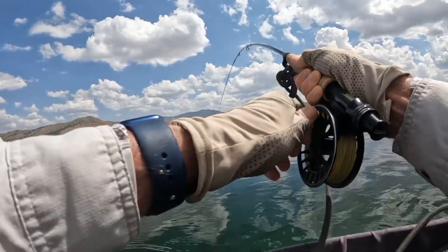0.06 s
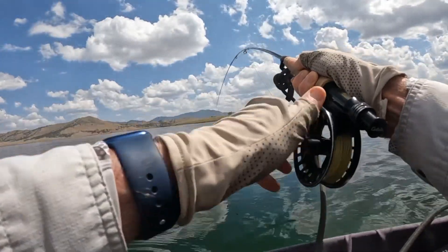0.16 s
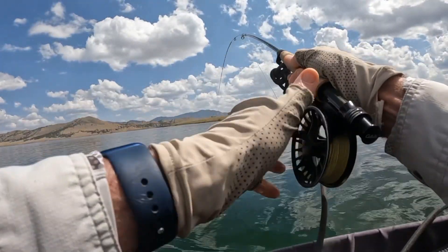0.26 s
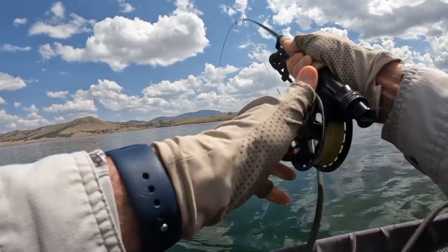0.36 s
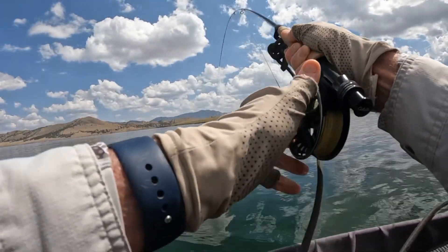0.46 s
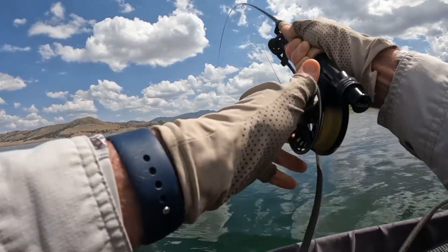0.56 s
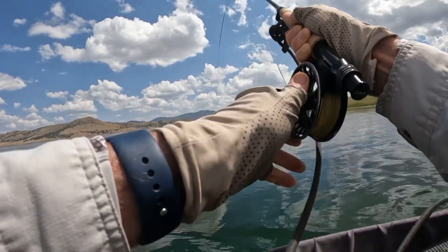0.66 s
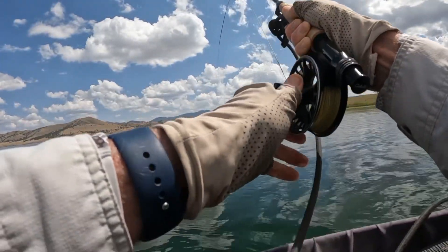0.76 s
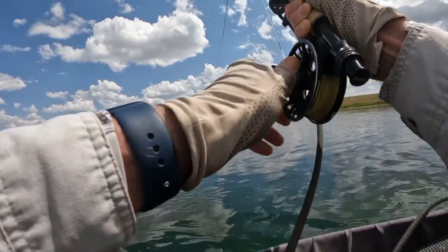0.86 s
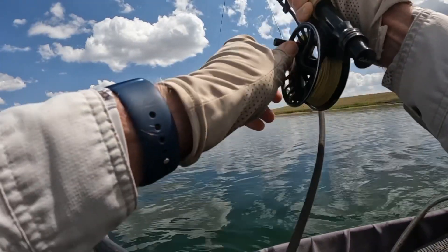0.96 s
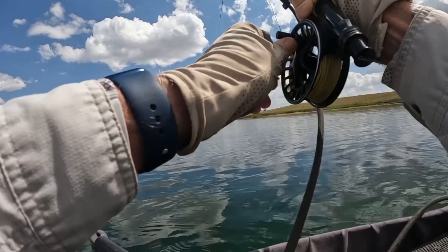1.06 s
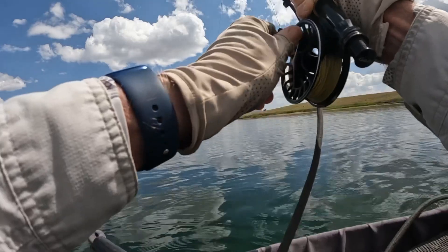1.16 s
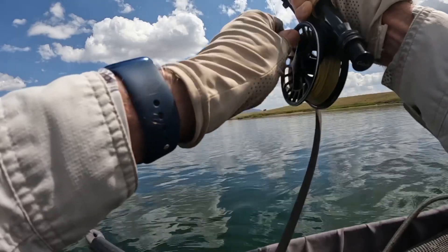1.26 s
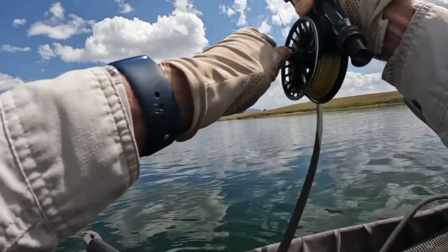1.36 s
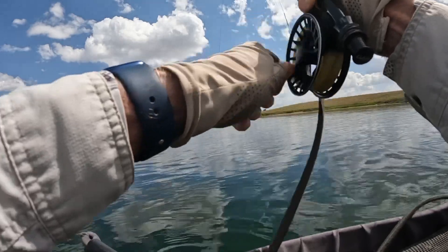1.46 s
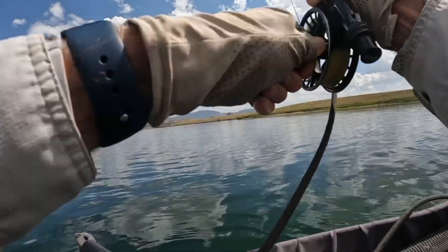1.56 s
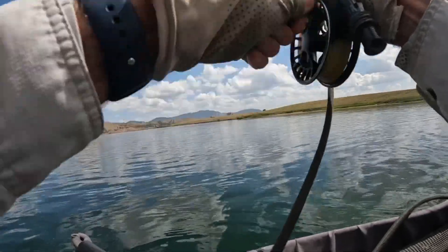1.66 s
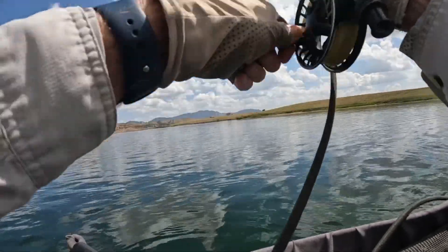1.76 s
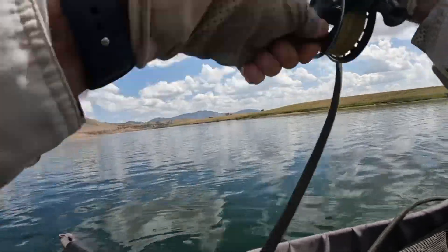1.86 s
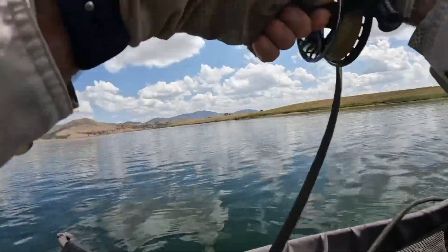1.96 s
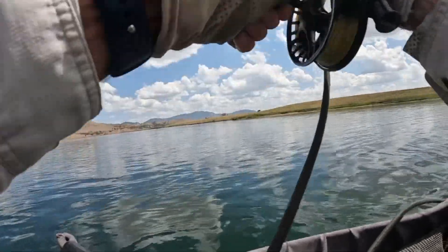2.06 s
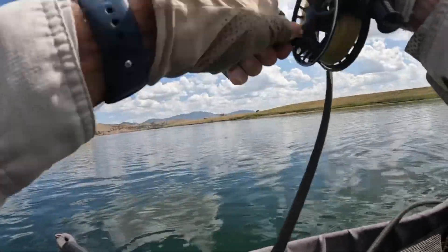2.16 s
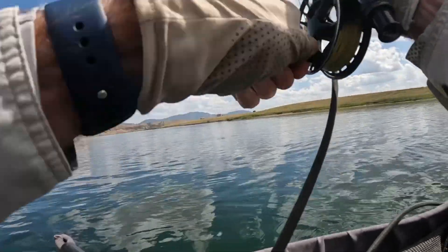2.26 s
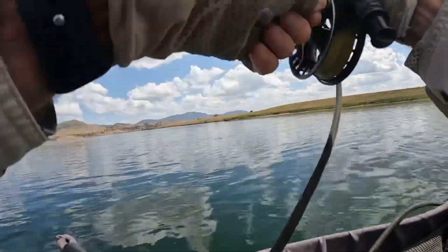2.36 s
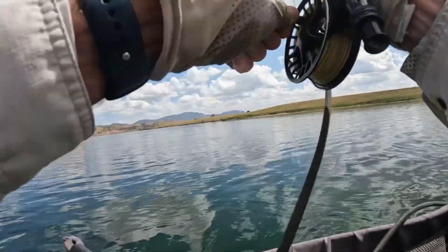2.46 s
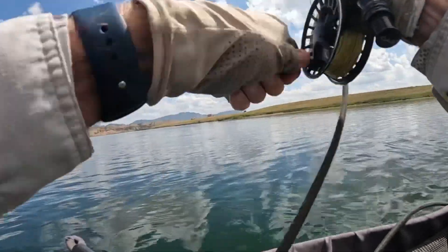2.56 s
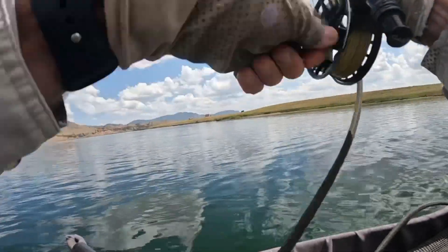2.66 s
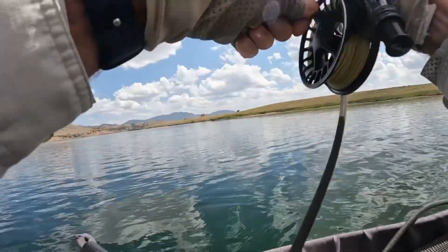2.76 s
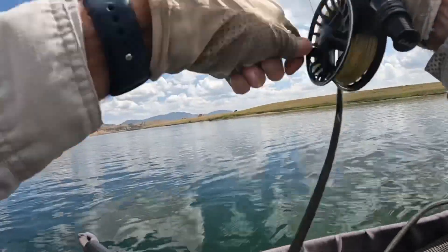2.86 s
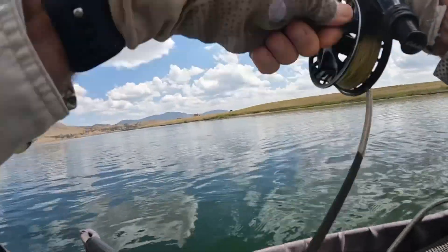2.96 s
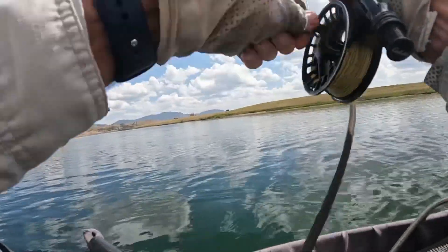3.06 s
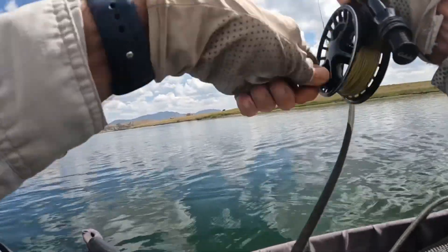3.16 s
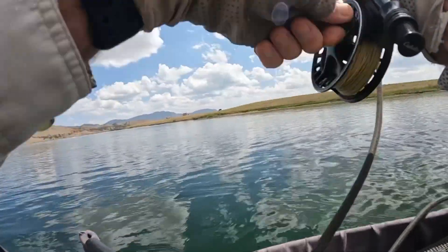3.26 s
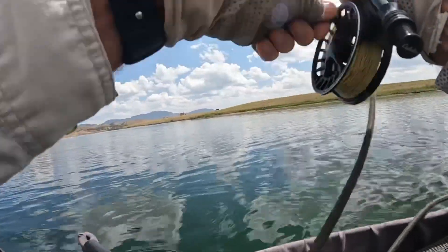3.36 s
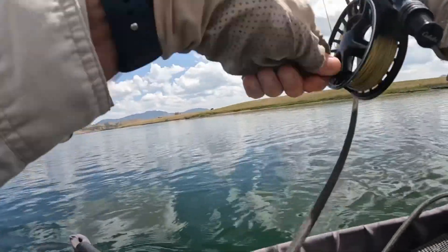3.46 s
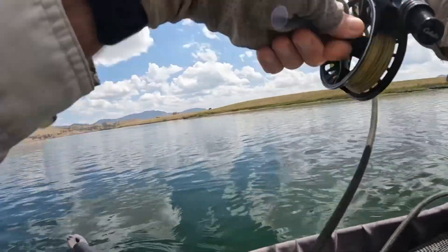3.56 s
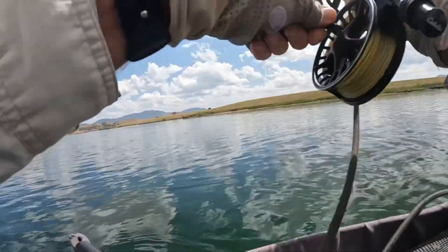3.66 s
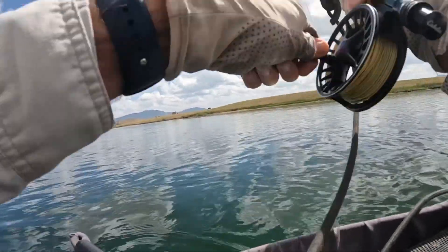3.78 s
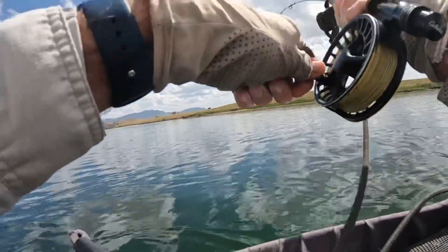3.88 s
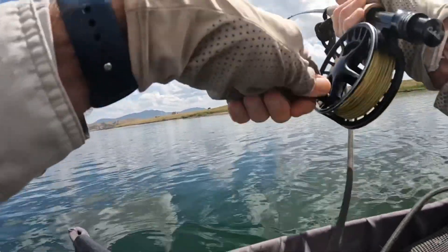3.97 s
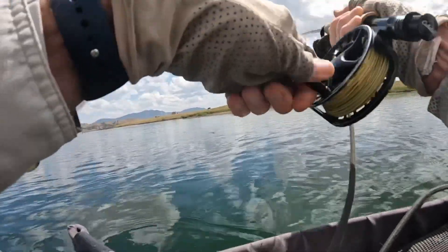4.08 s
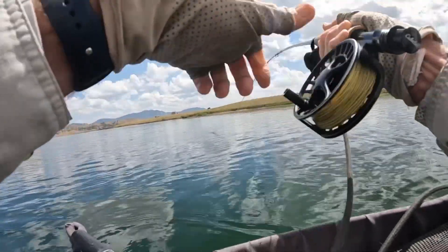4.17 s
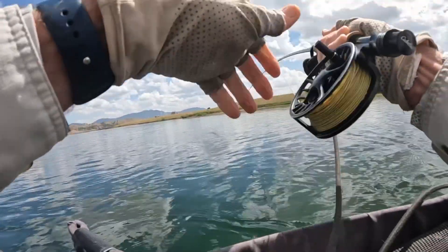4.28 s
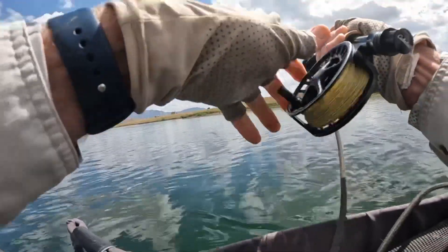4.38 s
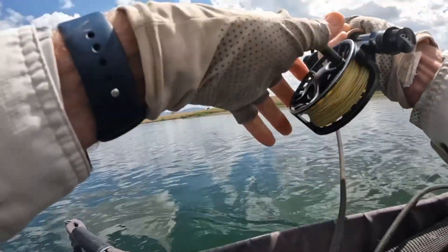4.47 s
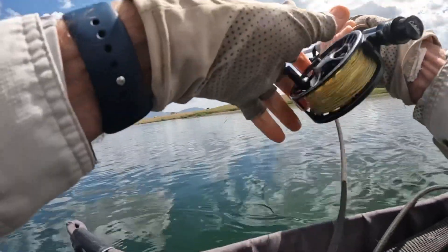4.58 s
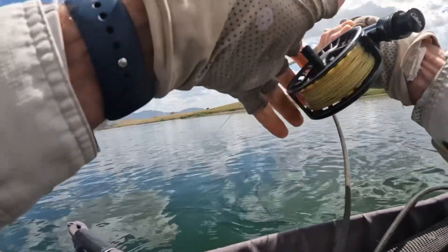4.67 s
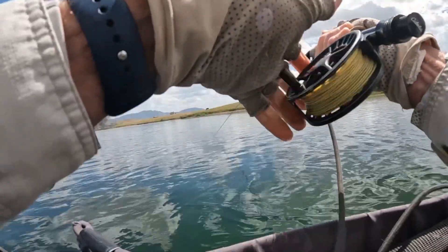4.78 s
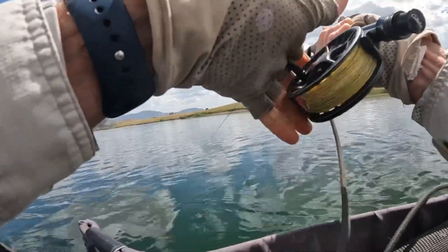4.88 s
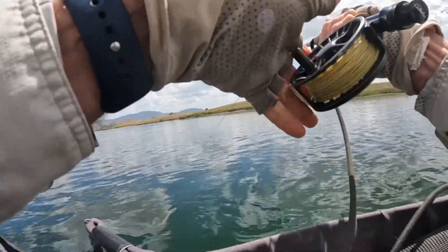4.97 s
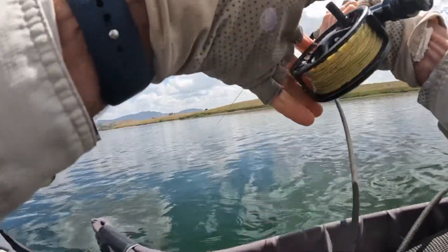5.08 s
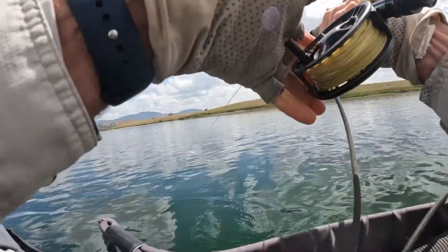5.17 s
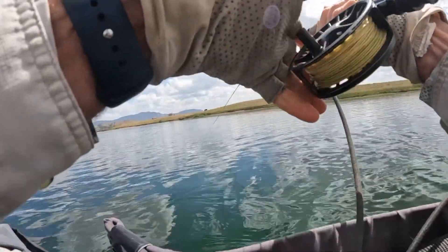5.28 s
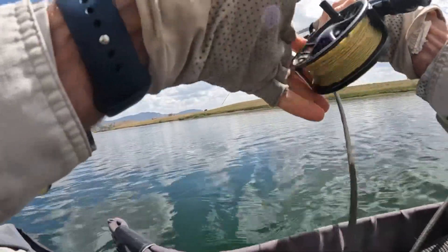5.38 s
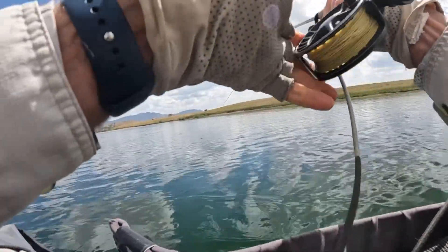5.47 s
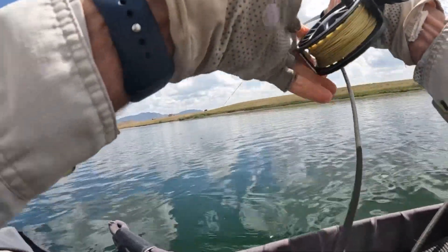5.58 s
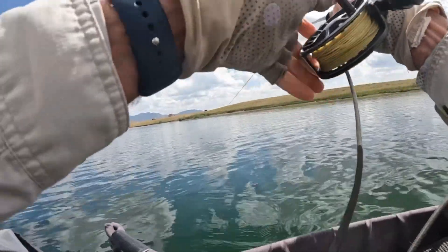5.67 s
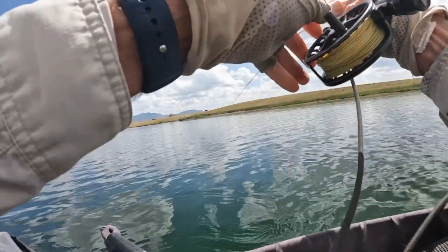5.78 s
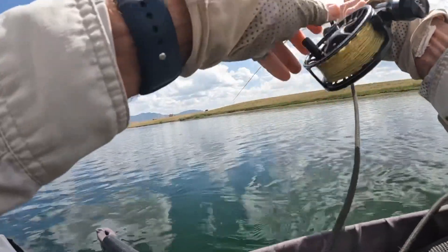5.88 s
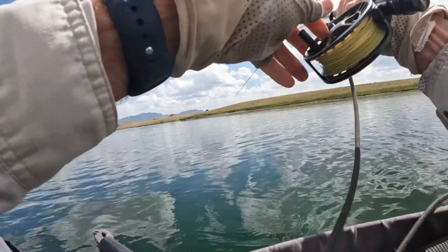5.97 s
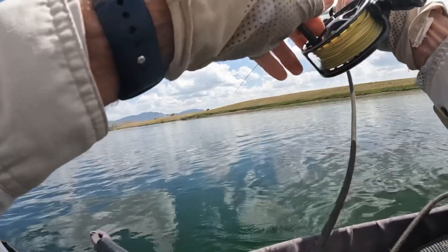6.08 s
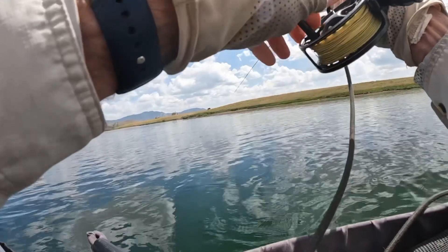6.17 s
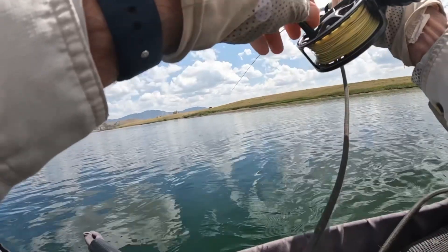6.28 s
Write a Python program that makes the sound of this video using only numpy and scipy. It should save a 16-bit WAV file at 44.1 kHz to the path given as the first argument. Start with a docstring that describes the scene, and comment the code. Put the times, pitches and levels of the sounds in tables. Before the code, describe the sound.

A fly fishing reel clicks as it is wound in and buzzes in bursts as a fish pulls line, over low wind rumble.

```python
"""Fly reel on a breezy lake

A hooked fish pulls line off a nearby reel in bursts, and a hand winds it back. A pawl (a small
catch on a spring) snaps over the teeth of the spool's gear and makes the frame ring, while the
drag (the reel's brake) rubs. The boat's hull creaks and knocks, and wind rumbles on two microphones."""
import sys
import numpy as np
from scipy import signal
from scipy.fft import rfft, irfft
from scipy.io import wavfile
from scipy.ndimage import uniform_filter1d, map_coordinates

SR = 44100
rng = np.random.default_rng(int(sys.argv[2]) if len(sys.argv) > 2 else 0)


def wav_record(signal):
    """Record a signal, one row per channel, as 16-bit PCM in the file named by sys.argv[1]."""
    frames = np.transpose(np.atleast_2d(signal))
    bounded = np.clip(frames, -1, 1)
    # unit amplitude maps onto the largest positive 16-bit level
    quanta = np.round(bounded * 32767).astype(np.int16)
    wavfile.write(sys.argv[1], SR, quanta)


N = 279064

# The fish pulls line out, one list for each burst: (time [s], speed [teeth per s])
FISH_RUNS = [
    [(0.2083, 73.9), (0.253, 144.3), (0.2698, 229.5), (0.3455, 193.3), (0.3691, 221.5), (0.3946, 253.7),
     (0.4172, 277.2), (0.4603, 188.1), (0.4814, 188.2), (0.495, 190), (0.505, 150), (0.5182, 104)],
    [(4.2494, 70.9), (4.2897, 125.4), (4.3115, 160.3), (4.4066, 195.1), (4.4346, 231.3), (4.48, 254.2),
     (4.4924, 240.6), (4.5189, 207.0), (4.5515, 278.2), (4.5676, 125.5), (4.58, 163.5), (4.6282, 86.9)],
    [(4.6371, 136.5), (4.6577, 258.7), (4.6724, 252.4), (4.6917, 188.2), (4.7063, 205.5), (4.7206, 219.2),
     (4.7358, 311.9), (4.7504, 364.0), (4.7699, 351.3), (4.7902, 351.6), (4.8035, 211.7), (4.8162, 314.9),
     (4.8368, 533.1), (4.8617, 515.9), (4.8763, 445.9)],
    [(4.894, 388.8), (4.931, 476.9), (4.9562, 394.2)],
    [(4.964, 300.7), (4.9805, 184.6), (5.0285, 313.2), (5.0446, 311.4), (5.0869, 210.2), (5.1264, 189.2),
     (5.1824, 173.8), (5.199, 170.2), (5.2559, 323.0), (5.2744, 331.0), (5.2996, 299.3), (5.3132, 298.2),
     (5.3383, 254.1), (5.3819, 250.6), (5.4335, 140.4), (5.5284, 69.0)],
    [(5.8803, 38), (5.921, 58), (5.991, 75), (6.021, 72), (6.066, 27)],
]
# The hand winds line in, one list for each stretch: (time [s], speed [teeth per s])
HAND_WINDS = [
    [(1.4185, 90.1), (1.5066, 68.6), (1.548, 74.9), (1.6338, 135.4), (1.6756, 56.1), (1.7384, 104.6),
     (1.7552, 122.3), (1.7856, 143.5), (1.7982, 176.7), (1.8641, 66.7), (1.8856, 114.6), (1.9058, 87.6),
     (1.9893, 103.9), (2.0528, 84.8), (2.2022, 129.1), (2.258, 82.8)],
    [(2.3437, 86.0), (2.4001, 160.4), (2.4243, 85), (2.447, 60), (2.4815, 79.3), (2.581, 141.5),
     (2.6153, 94.6), (2.7185, 138.6), (2.7359, 92.8), (2.8126, 85.5), (2.8297, 147.3), (2.955, 110.3),
     (2.9705, 137.3), (3.006, 145.0), (3.0262, 153.3), (3.0688, 80.9), (3.0907, 107.2), (3.1424, 122.3),
     (3.191, 165.3), (3.2394, 125.2), (3.2543, 145.2), (3.3081, 115.5), (3.36, 77.7), (3.4636, 172.7),
     (3.5245, 92.2), (3.5749, 101.9), (3.593, 126.9), (3.6681, 85.8), (3.6993, 104.5), (3.7154, 143.6),
     (3.7817, 68)],
    [(3.9851, 55.9), (4.0355, 62.4), (4.091, 46.2)],
]
# The clicks swell and change tone as the spoked spool turns: (time [s], level [dB], tone centre [Hz])
CLICK_TONE = [(0.208, -23, 3800), (0.247, -21.5, 3950), (0.271, -29, 4000), (0.301, -25.5, 3770),
              (0.334, -23, 3900), (0.358, -26.5, 4200), (0.37, -26.5, 3570), (0.397, -24.5, 3850),
              (0.46, -25.5, 3980), (0.493, -24.5, 4100), (0.52, -27.5, 3480), (1.418, -31, 4260),
              (1.475, -38, 3680), (1.496, -36, 3320), (1.573, -31, 3600), (1.621, -33.5, 4160),
              (1.723, -34, 3830), (1.777, -32, 4400), (1.858, -33.5, 3400), (1.903, -32, 3860),
              (2.067, -34, 4200), (2.097, -32.5, 4150), (2.26, -32, 3530), (2.343, -32.5, 4230),
              (2.564, -33, 3900), (2.6, -37, 3400), (2.66, -31.5, 3600), (2.693, -32, 4020),
              (2.738, -33.5, 4300), (2.909, -34.5, 4060), (2.936, -31, 3600), (3.058, -33, 4200),
              (3.094, -32, 4340), (3.202, -34.5, 3840), (3.295, -30, 4040), (3.328, -35, 4200),
              (3.376, -31, 4330), (3.459, -34.5, 4180), (3.495, -32, 3540), (3.549, -28, 3970),
              (3.627, -33, 4100), (3.705, -31, 4300), (3.785, -37, 3920), (3.984, -29.5, 4150),
              (4.093, -30.5, 3550), (4.25, -19.5, 3850), (4.327, -23.5, 4070), (4.336, -25.5, 4560),
              (4.369, -21.5, 3520), (4.399, -17, 4280), (4.42, -23, 4500), (4.432, -23, 4150),
              (4.444, -21, 4100), (4.501, -25.5, 3600), (4.54, -21, 3870), (4.555, -20, 4000),
              (4.573, -27, 3270), (4.6, -25.5, 3820), (4.63, -20, 4220), (4.636, -19.5, 4100),
              (4.648, -22, 4040), (4.681, -22.5, 3560), (4.69, -28, 3700), (4.735, -21.5, 3740),
              (4.747, -21, 3900), (4.762, -22, 3400), (4.774, -24, 4370), (4.786, -20, 4030),
              (4.807, -24, 3670), (4.822, -21, 3900), (4.873, -19, 3970), (4.894, -21.5, 4000),
              (4.918, -18.5, 3860), (4.933, -25.5, 4100), (4.955, -15, 4060), (4.972, -22.5, 3800),
              (5.002, -26, 4200), (5.02, -19, 3760), (5.053, -23.5, 3900), (5.08, -20, 4670),
              (5.11, -24, 3400), (5.149, -24.5, 4230), (5.173, -23, 3460), (5.193, -18.5, 3770),
              (5.295, -24.5, 4020), (5.328, -18.5, 3600), (5.337, -22.5, 3630), (5.355, -24, 4000),
              (5.379, -19, 4260), (5.403, -24, 3420), (5.445, -23.5, 4280), (5.484, -24, 3590),
              (5.53, -18.5, 4040), (5.62, -42, 4070), (5.88, -26, 4700), (5.913, -29, 3780),
              (5.997, -21, 4010), (6.065, -23, 3840)]
# Tone of a click, running out and then winding in: (low [dB], middle [dB], treble [dB])
TONE_BY_DIRECTION = [(-6.5, -13, -12.5), (0.5, -1, -8)]
# Single clicks of the creeping spool: (time [s], level [dB], middle over low [dB], treble boost [dB])
LONE_CLICKS = [(0.0024, -31.5, -4, -8), (0.0209, -35, -9, 2), (0.0463, -35, -1, -1),
               (0.0809, -31.5, -8, -2.5), (0.1507, -34, -4, -3), (0.1757, -34.5, -3, -2),
               (0.194, -33.5, -1, -3), (0.537, -44.5, 16, -1), (0.8715, -60, -5, 8),
               (0.9839, -33.5, -5, -2.5), (1.015, -33, -9, -2), (1.0522, -33.5, -19, -2),
               (1.0817, -33.5, 10, 1), (1.1084, -29.5, -9, -6), (1.13, -51, 0, 2), (1.2074, -65, 0, 3),
               (1.221, -31.5, 6, -1), (1.2488, -43, 6, 6), (1.2665, -36.5, 12, -9),
               (2.2714, -30.5, -4, -5.5), (2.3243, -29.5, -9, -8.5), (3.8024, -40, -8, 6),
               (3.8286, -38, -7, 0), (3.856, -37, -16, 2.5), (3.8878, -33.5, -10, -2),
               (3.9385, -31.5, -8, 5.5), (4.179, -40.5, 40, -19), (4.2165, -35.5, -6, -6),
               (5.544, -28.5, -12, -8.5), (5.5677, -28.5, -7, -8), (5.6194, -29.5, 0, -10.5),
               (5.6504, -68.5, 0, 18), (5.7624, -32.5, -14, -5), (5.8019, -35, -11, 0),
               (5.8295, -33, -8, -2.5), (5.8537, -36, -2, 0), (6.2737, -40.5, 31, 0.5)]
USUAL_CLICK_DB, USUAL_CLICK_HZ = -26, 3900

def gear_teeth():
    """Each passing tooth makes one click: (time [s], low [dB], middle [dB], treble [dB])."""
    times = np.concatenate([beats(rows)[0] for rows in FISH_RUNS + HAND_WINDS])
    tone_s, tone_db, tone_hz = np.transpose(CLICK_TONE)
    db = np.interp(times, tone_s, tone_db)
    tilt_db = 11 * np.log2(np.interp(times, tone_s, tone_hz) / USUAL_CLICK_HZ)
    low_db, middle_db, treble_db = np.array(TONE_BY_DIRECTION)[winding_in(times)].T
    treble_db = treble_db + USUAL_CLICK_DB + .39 * (db - USUAL_CLICK_DB)  # the treble swells less
    turning = np.c_[times - .0013, db + low_db - tilt_db, db + middle_db + tilt_db, treble_db]
    times, db, tilt_db, treble_db = np.transpose(LONE_CLICKS)
    creeping = np.c_[times, db - tilt_db / 2, db + tilt_db / 2, db + treble_db]
    clicks = np.vstack([turning, creeping])
    return clicks[np.argsort(clicks[:, 0])]


# When the spool turns inward: (start [s], end [s])
WINDING_TIMES = [(0, .12), (.8, 4.13)]

def winding_in(times):
    """Gives 1 while line is wound in, otherwise 0."""
    return sum((start < times) & (times < end) for start, end in WINDING_TIMES)


def pawl(clicks, chatter_s, chatter_db, gain_db):
    """The pawl snaps off each tooth: the frame rings, with a bright scratch, a crack and a ping."""
    times, *levels = np.transpose(clicks)
    levels = np.array(levels) + gain_db
    low_db, middle_db, treble_db = levels
    winding = winding_in(times)
    starts = np.round((times + .0008) * SR).astype(int)
    frame = frame_rings(starts, levels, winding, chatter_s, chatter_db)
    scratch = band(fade(taps(starts, treble_db - 6), .0021) * stereo_noise(.7), 7100, 12700)
    crack = band(taps(starts, middle_db + np.where(winding, 11, 9)), 6600, 8800)  # the bare spring
    tone_s, _, tone_hz = np.transpose(CLICK_TONE)
    tone_ratio = np.interp(times, tone_s, tone_hz) / USUAL_CLICK_HZ
    ping_hz = USUAL_CLICK_HZ * tone_ratio ** 1.43  # swings wider than the tone centre
    ping_db = (low_db + middle_db) / 2 + np.where(winding, 7.5, 17)
    return frame + scratch + (crack + pings(starts, ping_db, ping_hz)) * amp([[-.9], [.9]])


def pings(starts, db, hz):
    """Each snap opens with a blip about two waves long, at a pitch of its own."""
    span, out = np.arange(60), np.zeros(N + 60)
    cycles = np.outer(hz, span / SR) - 1.6
    blips = -np.exp(-.5 * (cycles / .56) ** 2) * np.cos(2 * np.pi * cycles)
    np.add.at(out, starts[:, None] + span, amp(db)[:, None] * blips)
    return out[:N]


# The notes that the spool and frame ring at: (pitch [Hz], level running out [dB],
# level winding in [dB], ring time before the limit below [s], left over right [dB])
FRAME_NOTES = [(2190, -17, -11, 0.0023, 29), (2660, -4, -4.5, 0.0063, -16), (2850, -15, -9, 0.036, -6),
               (3200, 2.5, -4.5, 0.022, 0), (3810, -4, -1, 0.033, -2.5), (4144, -3.5, -6, 0.048, 3.5),
               (4593, 8, 5.5, 0.0057, -0.5), (5100, -0.5, -27, 0.024, -11), (6174, 7, 5, 0.015, -5),
               (6663, 12.5, 9, 0.005, -1), (7710, -3.5, -9.5, 0.017, -7), (8530, -45, -6, 0.0081, -7),
               (9270, -3.5, -7.5, 0.012, 2.5), (10360, -6.5, -22.5, 0.048, 4),
               (11510, -5.5, -11.5, 0.014, 4.5), (12000, -6, -8.5, 0.01, 6), (13100, -14, -24, 0.0067, -3),
               (14700, -30, -32, 0.0028, 1)]
LONGEST_RING_S = .011  # every note of the frame dies within 11 ms, so the clicks stay short and dry

def frame_rings(starts, levels, winding, chatter_s, chatter_db):
    """Each snap strikes all the frame's notes, and the pawl's brief chatter roughens them."""
    out = np.zeros((2, N))
    noises = rng.standard_normal((2, N))
    for hz, out_db, in_db, ring_s, pan_db in FRAME_NOTES:
        alike = np.clip(1.2 - hz / 14000, 0, 1)
        grit = spread(*np.roll(noises, rng.integers(N), axis=1), alike)  # its own noise for each note
        ring_s = min(ring_s, LONGEST_RING_S)
        # Blend the low, middle and treble levels to suit this pitch.
        shares = [np.interp(hz, [3000, 4500, 6000], one) for one in np.eye(3)]
        db = np.dot(shares, levels) + np.where(winding, in_db, out_db)
        db += np.interp(hz, [5500, 7500], [2.5, 3.5]) * tooth_drift(len(starts))
        rattle_db = db + chatter_db + 4 * winding  # the pawl drags more when winding in
        rattle_db += np.interp(hz, [7000, 9000], [0, 6])
        chatter = fade(taps(starts, rattle_db), chatter_s) * grit
        rough = band(ring(chatter, hz, ring_s), hz / 2.33, hz * 1.4)
        wandering_hz = hz + 80 * tooth_drift(len(starts))  # shifts as spool and hand move
        clean = struck_note(starts, db + 1, wandering_hz, ring_s)
        out += (clean + rough) * amp([[pan_db / 2], [-pan_db / 2]])
    return out


def struck_note(starts, db, hz, ring_s, rise_s=.0005):
    """One note of the frame swells quickly and dies away after every tooth."""
    span = np.arange(int(ring_s * SR))
    t, out = span / SR, np.zeros(N + len(span))
    shape = amp(-60 * t / ring_s) * (1 - np.exp(-t / rise_s))
    notes = amp(db)[:, None] * shape * np.sin(2 * np.pi * np.outer(hz, t))
    np.add.at(out, starts[:, None] + span, notes)
    return out[:N]


# Moments when the gear catches: (time [s], low [dB], middle [dB], treble [dB])
GEAR_CATCHES = [(0.49, -33, -38, -33.5), (1.607, -37, -43, -30), (2.9315, -42, -27, -27),
                (3.2644, -32, -35, -36), (4.8822, -10.5, -22, -19), (4.9592, -25, -9, -32),
                (5.2792, -15, -34, -37)]

def gear_catches():
    """The pawl catches harder and rattles for longer than on an ordinary tooth."""
    return pawl(GEAR_CATCHES, chatter_s=.003, chatter_db=-11.5, gain_db=-20.5)


# Tone of the rubbing brake: (frequency [Hz], level [dB])
RUB_TONE = [(710, -23.5), (1200, -9), (1600, -6), (3350, 4.5), (3790, 6.5), (5170, -4.5), (6220, -4.5),
            (8460, -9.5), (12200, -15.5), (13800, -17), (14300, -54)]
HALT_GAP_S, STIR_S = .052, .036  # a longer gap is a halt, quiet until just before the next tooth

def drag_rub(tooth_times):
    """The brake rubs the spool with a grainy hiss, louder and brighter the faster it turns."""
    t, gaps = np.arange(N) / SR, np.diff(tooth_times)
    last = np.clip(np.searchsorted(tooth_times, t) - 1, 0, len(gaps) - 1)
    until_next = tooth_times[last + 1] - t
    halted = (gaps[last] > HALT_GAP_S) & (np.abs(until_next - STIR_S / 2) > STIR_S / 2)
    speed = -np.log2(100 * gaps[last])  # 0 at 100 teeth per second, 1 more for each doubling
    smoothing = int(.045 * SR)
    db = uniform_filter1d(-49.5 + 3.5 * speed + 1.5 * winding_in(t) - 11.5 * halted, smoothing)
    click_db, click_hz = curves(CLICK_TONE)
    db += .45 * (click_db - uniform_filter1d(click_db, SR // 4))  # swells with the clicks
    hiss = coloured(stereo_noise(.85), RUB_TONE)
    dull = signal.sosfiltfilt(signal.butter(2, 6000, fs=SR, output="sos"), hiss)
    hiss = dull + amp(3.5 * uniform_filter1d(speed, smoothing)) * (hiss - dull)
    tilt = np.clip(4.2 * np.log2(click_hz / USUAL_CLICK_HZ), -.9, .9)  # its tone follows the clicks
    hiss += tilt * (band(hiss, 2760, 3950) - band(hiss, 2300, 4300))
    return amp(db + 1.5 * drift(150) + [[-1.5], [.6]]) * hiss


# Single slips in the hull: (time [s], level [dB])
HULL_SLIPS = [(2.346, -30.5), (4.653, -28), (4.685, -29), (4.812, -29), (4.84, -27), (4.868, -26),
              (4.909, -30), (5.271, -24), (5.486, -28.5), (5.528, -29), (5.563, -30), (5.73, -38),
              (6.032, -29.5)]
# Quick runs of slips, one list for each creak: (time [s], speed [slips per s], level [dB])
HULL_CREAKS = [
    [(.59, 135, -54), (.7, 83, -44.5), (.8, 99, -47), (.86, 62, -67)],
    [(2.072, 33.7, -39), (2.11, 30, -30), (2.29, 40, -32)],
    [(4.04, 89.6, -38), (4.15, 140, -33.5), (4.2, 61.3, -27), (4.4, 74, -31), (4.55, 48.4, -26),
     (4.64, 42, -30)],
]

def hull_creaks():
    """Each slip is a tick that falls in pitch as it runs through the hull; many make a creak."""
    slips, edges = np.zeros((2, N))
    for time, db in HULL_SLIPS:
        slips[round(time * SR)] = amp(db)
    for rows in HULL_CREAKS:
        times, rate = beats(rows)
        times += .0012 * rng.standard_normal(len(times))
        creak_s, _, creak_db = np.transpose(rows)
        db = np.interp(times, creak_s, creak_db) + .2 * rng.standard_normal(len(times))
        starts = np.round(times * SR).astype(int)
        slips[starts] = amp(db)
        edges[starts] = amp(db + 1.9 * np.log2(rate / 100))  # fast slips snap more sharply
    t = np.arange(700) / SR
    hz = 330 + 1100 * np.exp(-t / .00075)
    tick = np.sin(2 * np.pi * np.cumsum(hz) / SR) * (1 - np.exp(-t / .0037)) * np.exp(-t / .0011)
    ticks = signal.fftconvolve(slips, amp(9.5) * tick)[:N]
    snap = amp(15) * band(edges, 1900, 3000)
    panel = amp(-11) * ring(edges, 1050, ring_s=.006)
    return (ticks + snap + panel) * amp([[1.2], [-1.2]])


# Dull bumps in the boat: (time [s], level [dB], pitch [Hz], rough length [waves])
BUMPS = [(0.352, -49, 1010, 11), (0.372, -36, 1160, 9.1), (3.299, -30, 1210, 12), (3.849, -20, 492, 7.5),
         (3.919, -31, 394, 2.7), (4.556, -25, 114, 2.5), (6.136, -34, 200, 3.9)]

def knocks():
    """Soft blows on the tackle and hull each ring for a few waves that swell and die."""
    out = np.zeros(N)
    for time, db, hz, cycles in BUMPS:
        ring_s = .53 * cycles / hz
        blow = taps(round(time * SR), db)
        soft = ring(ring(blow, hz, ring_s), hz, ring_s)  # ringing twice softens the start
        out += soft * amp(db) / np.abs(soft).max()
    return out


# Low rumble of the breeze, plus the low body of the hull's long creak at 4.0-4.65 s:
# (time [s], deep level [dB], body level [dB])
RUMBLE = [(0.0, -39, -52), (0.09, -40, -59.5), (0.12, -48.5, -54.5), (0.6, -36.5, -66),
          (0.65, -44.5, -59.5), (0.88, -38, -57), (0.97, -40.5, -53), (1.16, -35, -62.5),
          (1.53, -38.5, -62), (2.08, -38, -50), (2.4, -41, -53.5), (2.68, -36, -56), (2.84, -46.5, -66),
          (2.98, -35.5, -57.5), (3.19, -45.5, -59.5), (3.33, -38.5, -58.5), (4.02, -42.5, -53),
          (4.44, -45, -40.5), (4.65, -47.5, -51), (5.71, -37.5, -58), (5.87, -50.5, -51.5),
          (6.33, -39.5, -66)]
# Gusts that thump the microphones: (time [s], boost to the low rumble [dB], half length [s])
GUSTS = [(0.36, 9, 0.036), (0.928, 9, 0.041), (1.492, 13, 0.027), (1.72, 7, 0.14), (2.068, 0, 0.038),
         (2.526, 17, 0.062), (2.863, 18.5, 0.076), (3.034, 3, 0.024), (3.756, 15, 0.044), (3.93, 14, 0.092),
         (4.884, 7.5, 0.05), (5.328, 7, 0.24), (5.616, 7.5, 0.29), (5.897, 12, 0.08)]

def wind_and_hull_rumble():
    """Wind on the microphones makes a lumpy rumble; one swell is the body of the hull's long creak."""
    deep_db, body_db = curves(RUMBLE)
    t = np.arange(N) / SR
    low_db = -58.5 + sum(db * np.exp(-((t - time) / half_s) ** 2) for time, db, half_s in GUSTS)
    lumps = drift(12)
    deep = amp(deep_db + 2.5 * lumps) * unit(band(stereo_noise(.55), 7, 30))
    low = amp(low_db + 3.2 * lumps) * unit(band(stereo_noise(.8), 55, 150))
    body_gain = amp(body_db + 1.54 * lumps + 2.8 * drift(40))
    body = body_gain * unit(band(band(stereo_noise(.7), 48, 295), 180, 2900))
    return deep + low + body


# Tone of the open air: (frequency [Hz], level [dB])
AIR_TONE = [(240, -29), (400, -18), (842, -12), (1120, 6), (1420, 2), (6180, -1.5), (10400, -14),
            (12300, -14), (13500, -50)]

def open_air():
    """A faint, wavering hiss lies behind everything."""
    return amp(-66.5 + 3.1 * drift(8.2)) * coloured(stereo_noise(.075), AIR_TONE)


def amp(db):
    """Turns decibels into a number to multiply by."""
    return 10 ** (np.asarray(db) / 20)


def unit(x):
    """Scales a signal to an average strength (rms) of 1."""
    return x / np.sqrt(np.mean(x ** 2) + 1e-20)


def curves(rows):
    """Joins a table's points in time, giving one value for every sample."""
    times, *columns = np.transpose(rows)
    return [np.interp(np.arange(N) / SR, times, column) for column in columns]


def beats(rows):
    """Counts events off along a speed curve, giving their times and the speed at each."""
    row_s, rate = np.transpose(rows)[:2]
    t = np.arange(row_s[0], row_s[-1], 1 / SR)
    passed = np.cumsum(np.interp(t, row_s, rate)) / SR
    times = np.interp(np.arange(int(passed[-1] + .3) + 1), passed, t)
    return times, np.interp(times, row_s, rate)


def drift(rate):
    """A smooth wobble through `rate` random points a second."""
    points = rng.standard_normal(int(N / SR * rate) + 3)
    return map_coordinates(points, [np.arange(N) / SR * rate], order=3, mode="nearest")


def tooth_drift(count):
    """A random wobble that changes slowly from tooth to tooth."""
    return unit(signal.lfilter(np.hanning(13), 1, rng.standard_normal(count + 13))[13:])


def taps(starts, db):
    """Silence with a one-sample spike at each start."""
    out = np.zeros(N)
    out[starts] = amp(db)
    return out


def fade(spikes, fade_s):
    """Gives each spike a tail that falls to about a third in fade_s."""
    return signal.lfilter([1], [1, -np.exp(-1 / (fade_s * SR))], spikes + 1e-18)


def ring(x, hz, ring_s):
    """Lets a signal ring one note, which dies by 60 dB in ring_s."""
    decay, step = amp(-60 / (ring_s * SR)), 2 * np.pi * hz / SR
    return signal.lfilter([0, np.sin(step)], [1, -2 * decay * np.cos(step), decay ** 2], x + 1e-18)


def band(x, low_hz, high_hz):
    """Keeps the sound between two frequencies."""
    return signal.sosfilt(signal.butter(2, [low_hz, high_hz], "band", fs=SR, output="sos"), x)


def spread(mid, side, alike):
    """Mixes two noises into left and right, from unrelated (0) to the same (1)."""
    return np.sqrt(1 + alike) * mid + np.sqrt(1 - alike) * side * [[1], [-1]]


def stereo_noise(alike):
    """Fresh white noise for left and right."""
    return spread(*rng.standard_normal((2, N)), alike)


def coloured(noise, tone):
    """Shapes noise with a table of (frequency [Hz], level [dB])."""
    hz, db = np.transpose(tone)
    grid_hz = np.arange(1, N // 2 + 2) * SR / N
    return unit(irfft(rfft(noise) * amp(np.interp(np.log(grid_hz), np.log(hz), db)), N))


def scene():
    """Adds up the reel, the boat and the breeze."""
    clicks = gear_teeth()
    reel = pawl(clicks, chatter_s=.001, chatter_db=-26, gain_db=-6.5)
    reel += gear_catches() + drag_rub(clicks[:, 0])
    return reel + hull_creaks() + knocks() + wind_and_hull_rumble() + open_air()


def record(dry):
    """The left microphone hears a moment late, less so in the treble; the highest treble is cut."""
    lag_s, cutoff_hz = .00002, 15800
    hz = np.arange(N // 2 + 1) * SR / N
    delay = np.exp(-2j * np.pi * np.minimum(hz, 5500) * lag_s)
    left = irfft(rfft(dry[0]) * delay, N)
    return signal.sosfilt(signal.cheby2(14, 60, cutoff_hz, fs=SR, output="sos"), [left, dry[1]])


dry = scene()
out = record(dry)
wav_record(out)
```